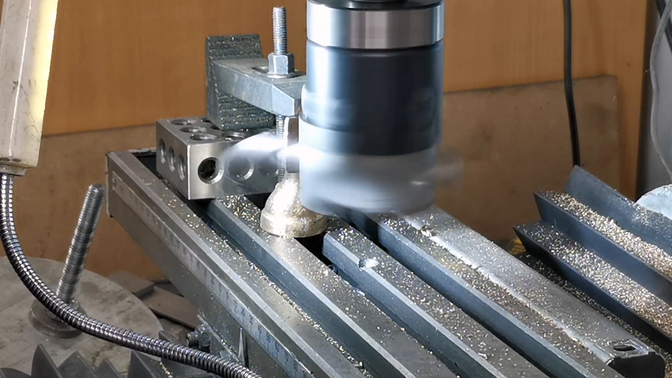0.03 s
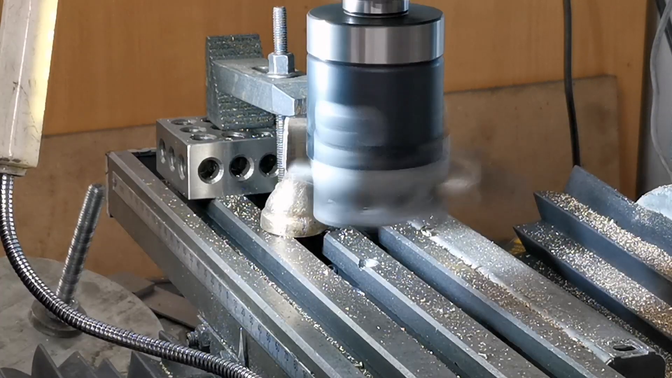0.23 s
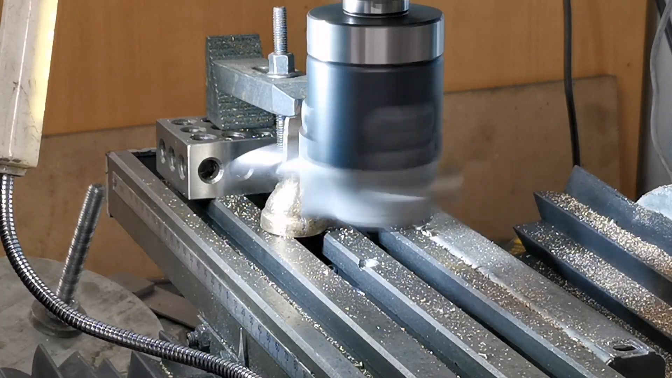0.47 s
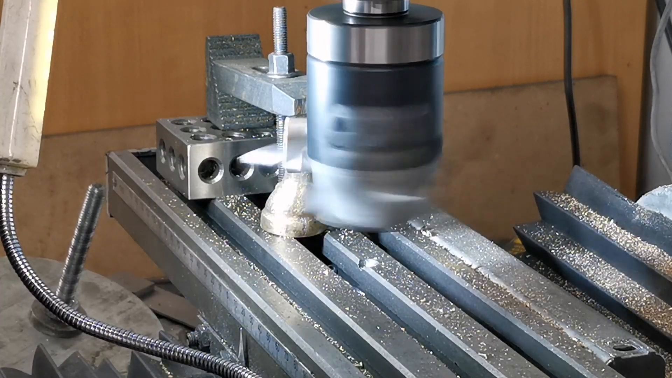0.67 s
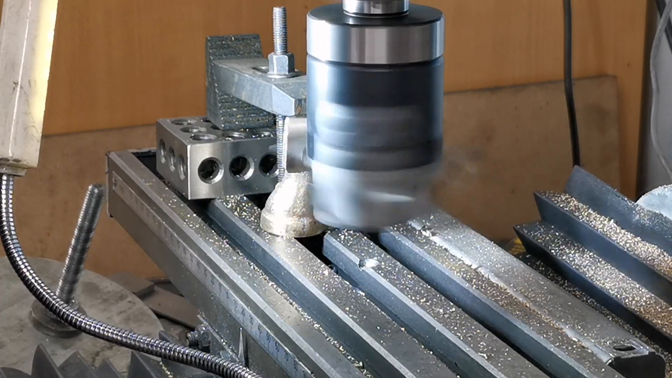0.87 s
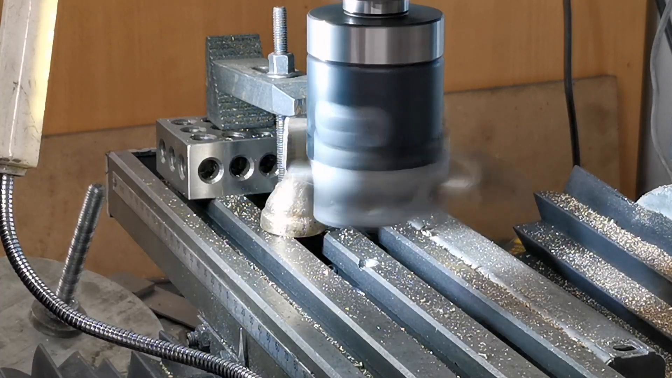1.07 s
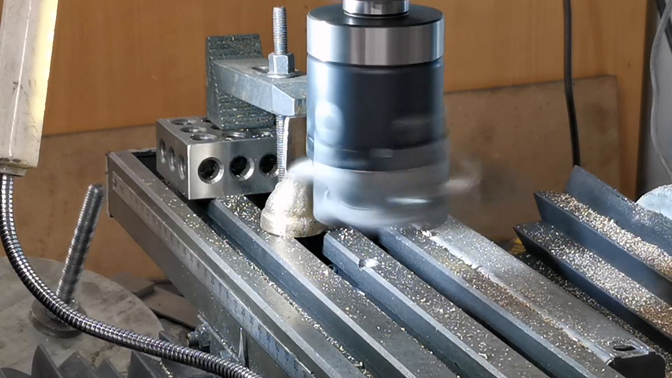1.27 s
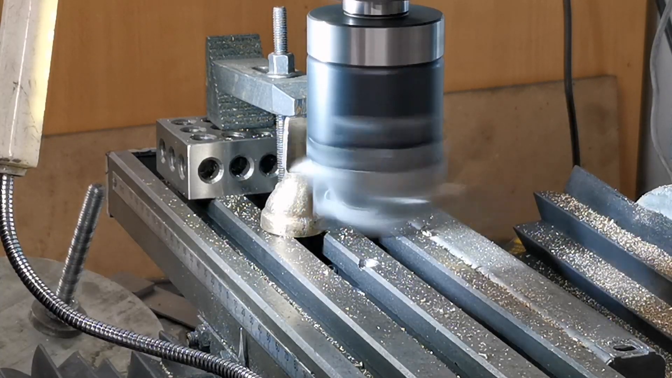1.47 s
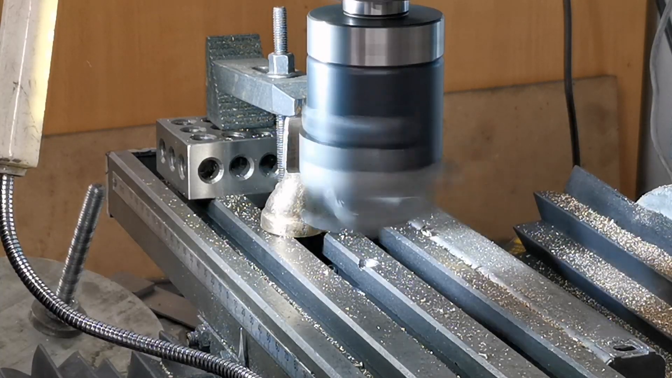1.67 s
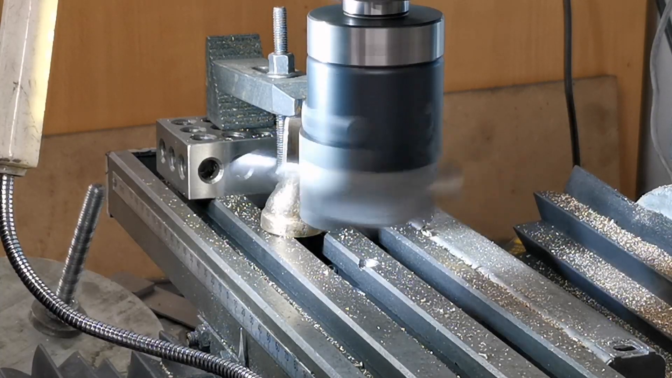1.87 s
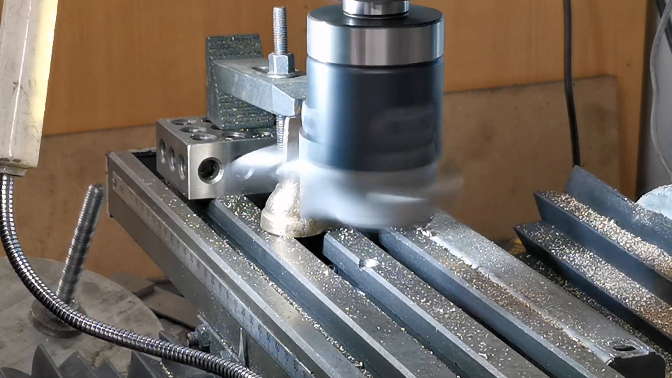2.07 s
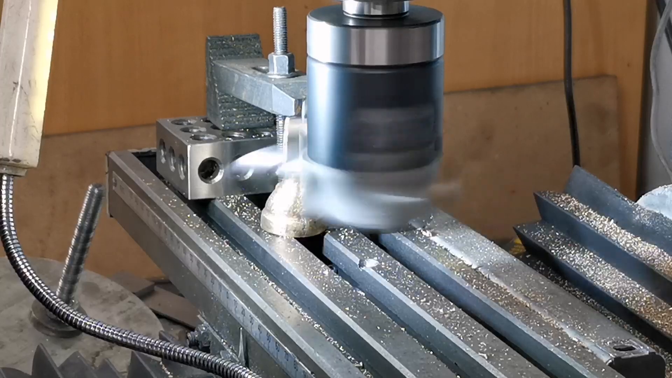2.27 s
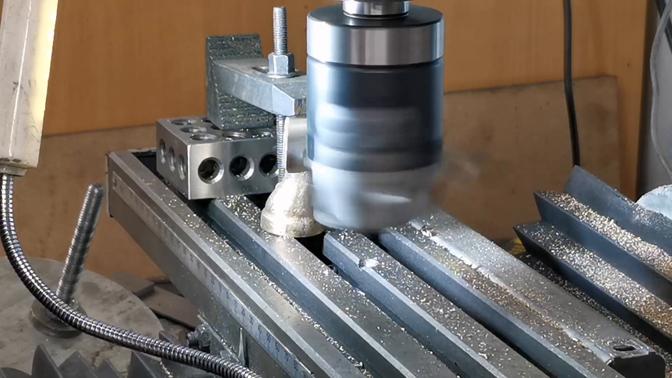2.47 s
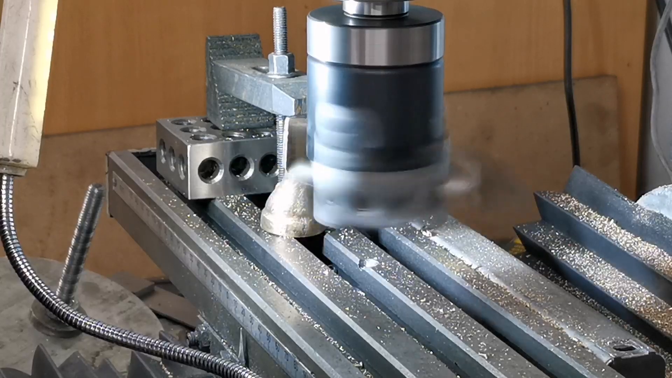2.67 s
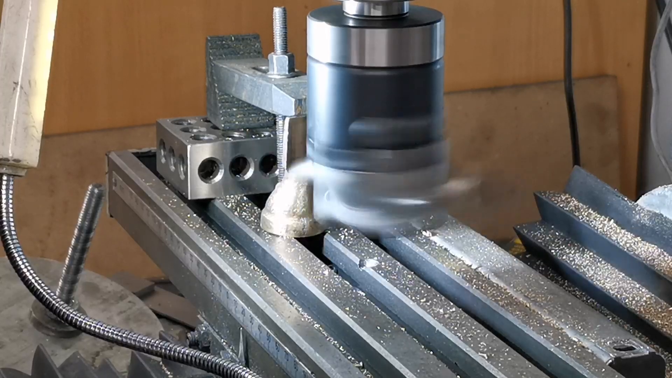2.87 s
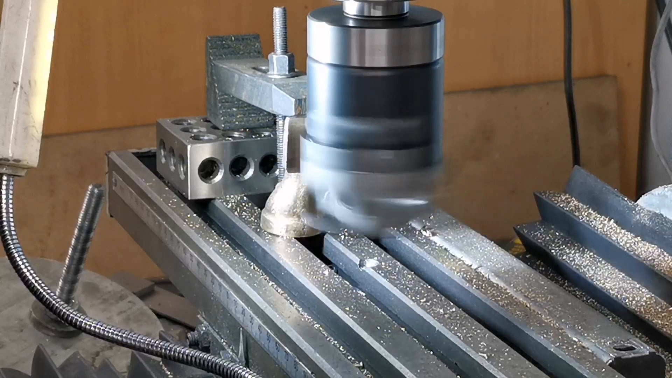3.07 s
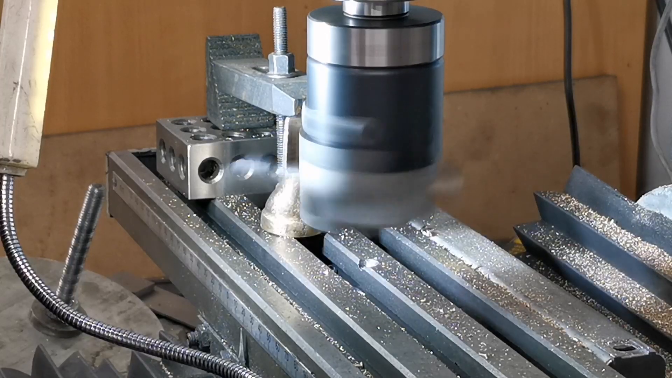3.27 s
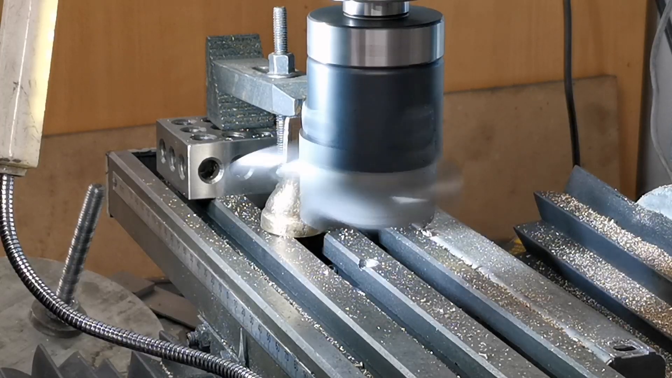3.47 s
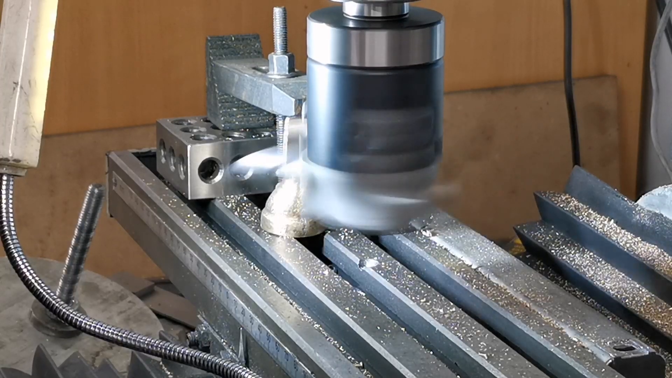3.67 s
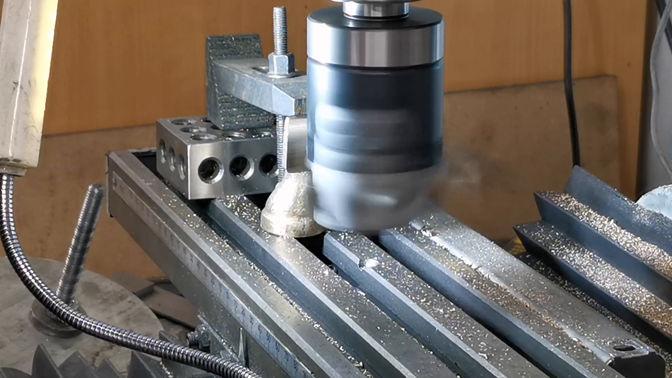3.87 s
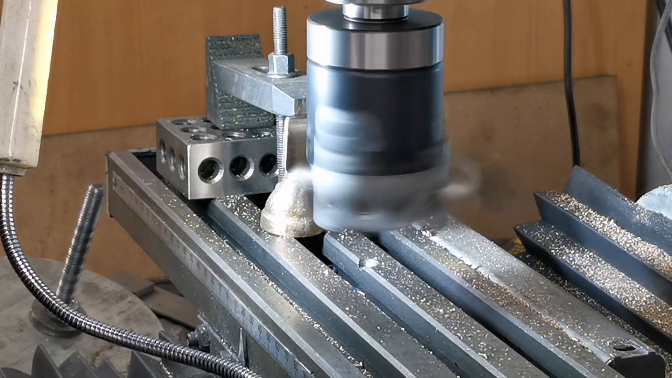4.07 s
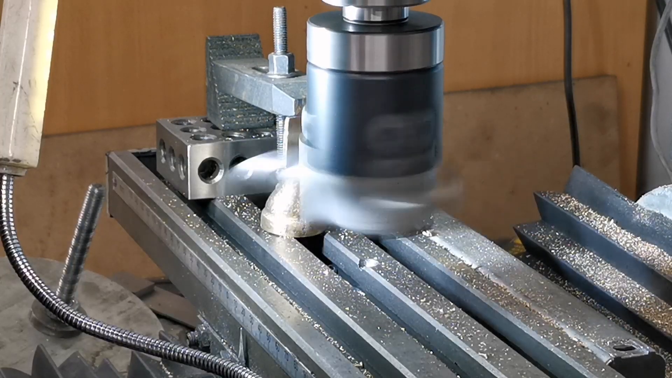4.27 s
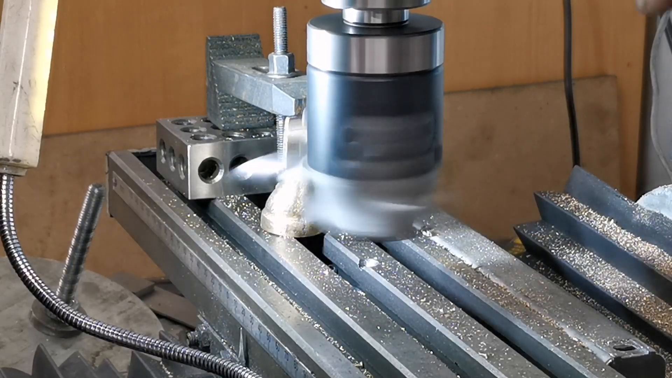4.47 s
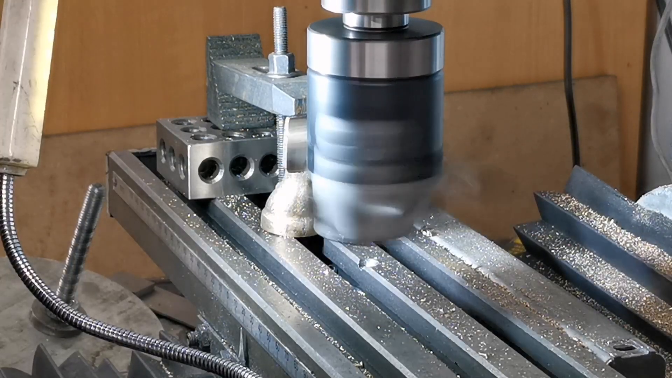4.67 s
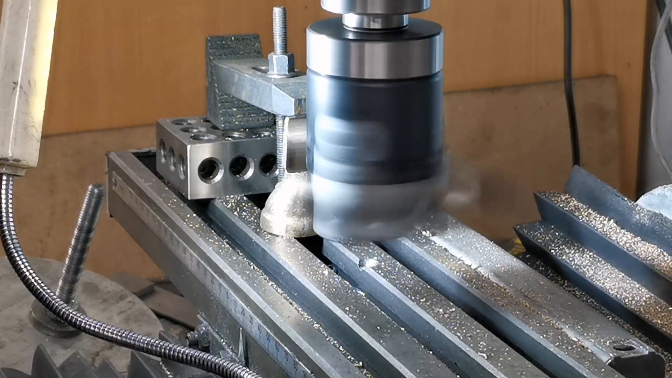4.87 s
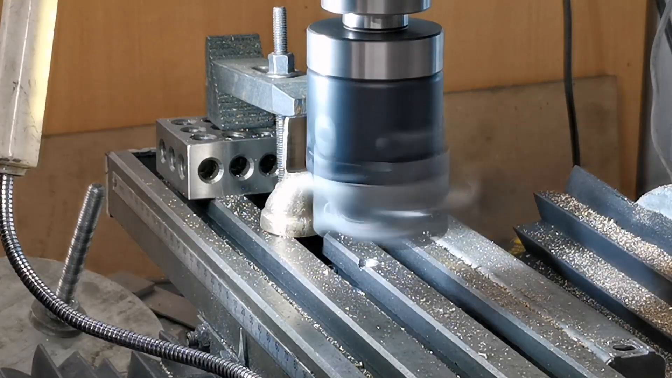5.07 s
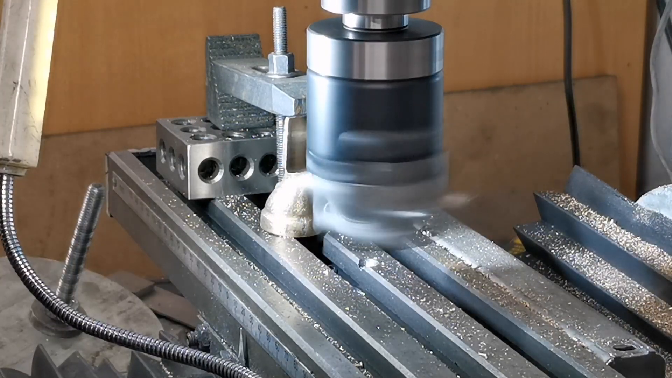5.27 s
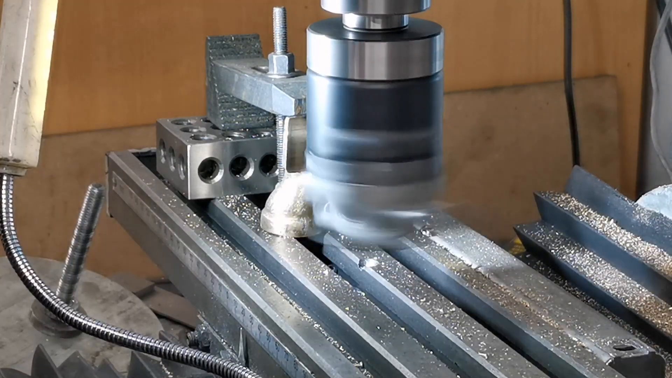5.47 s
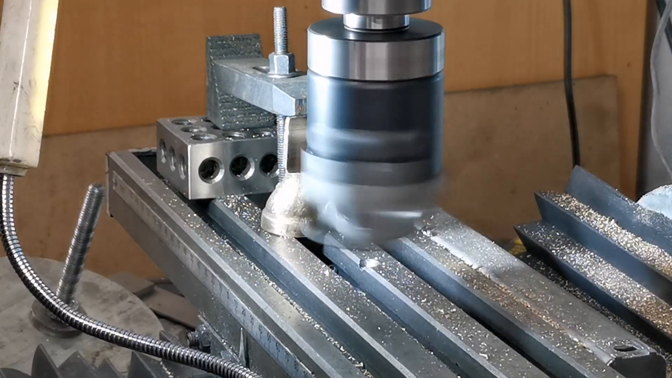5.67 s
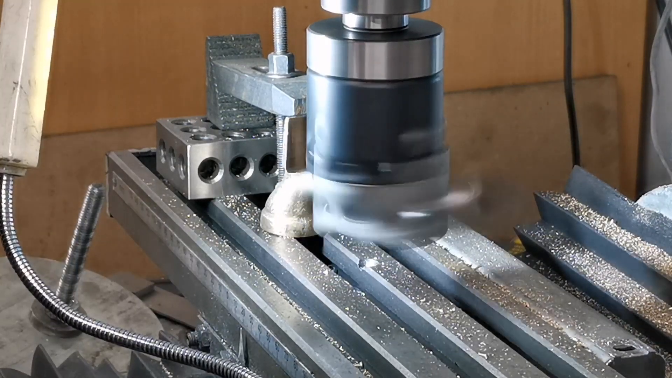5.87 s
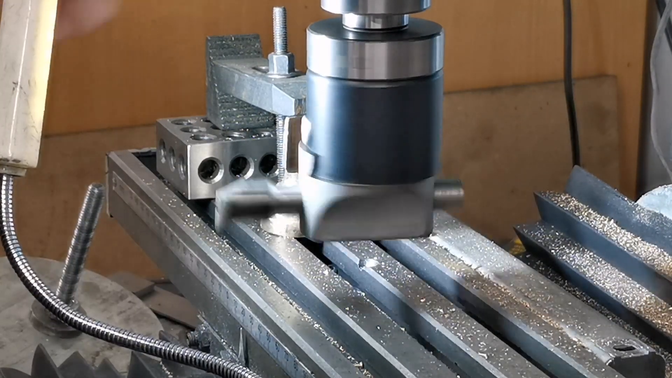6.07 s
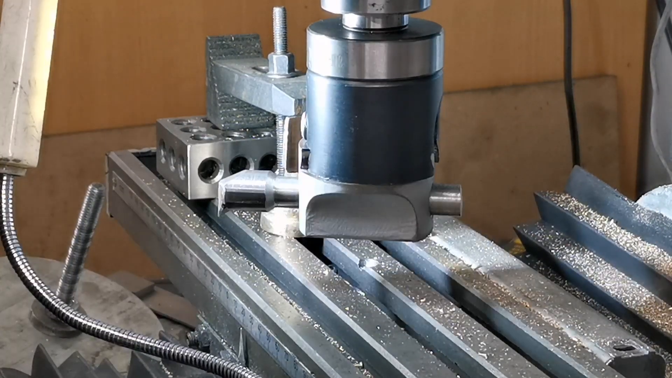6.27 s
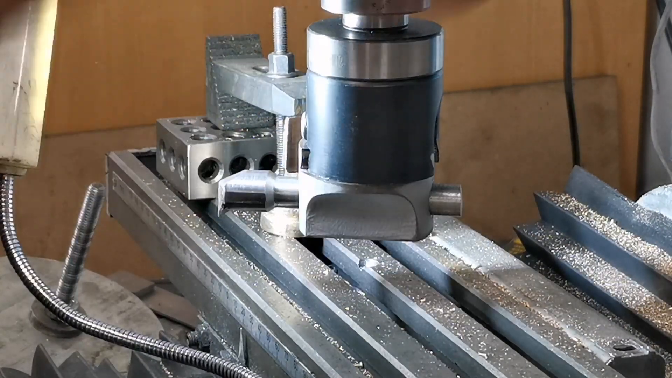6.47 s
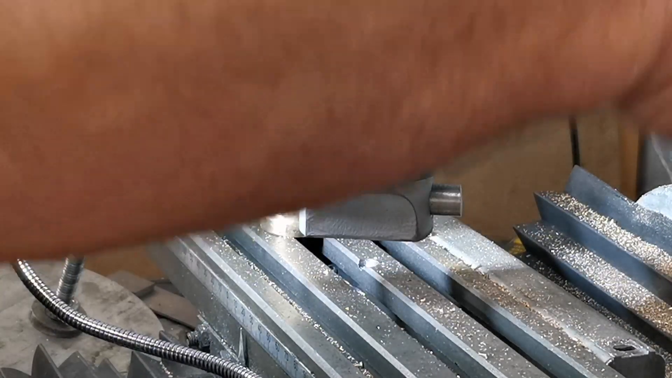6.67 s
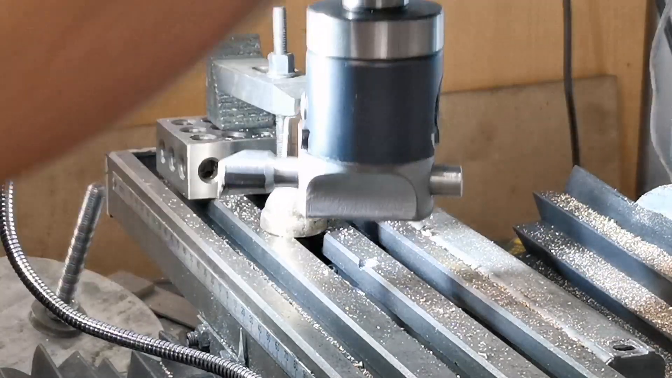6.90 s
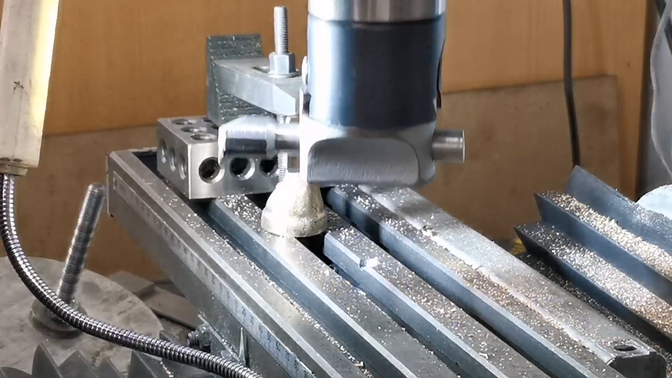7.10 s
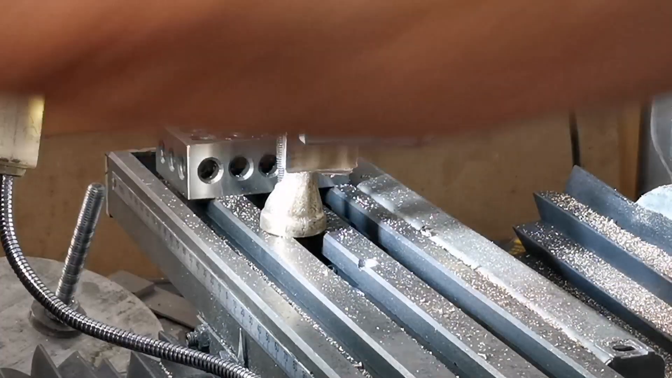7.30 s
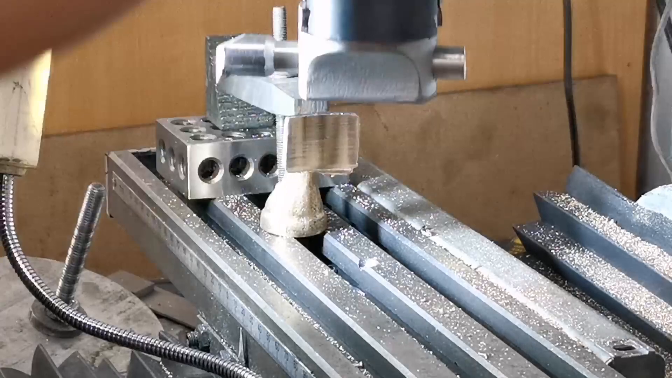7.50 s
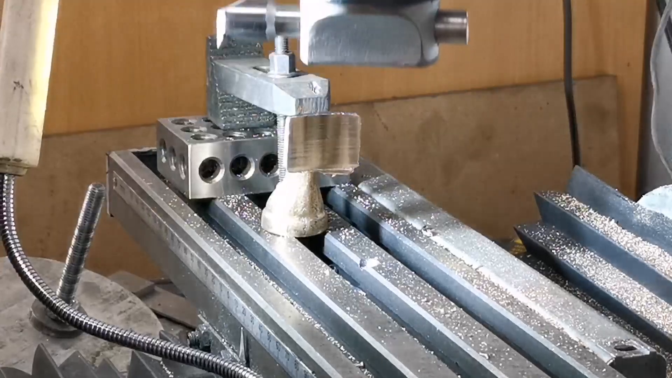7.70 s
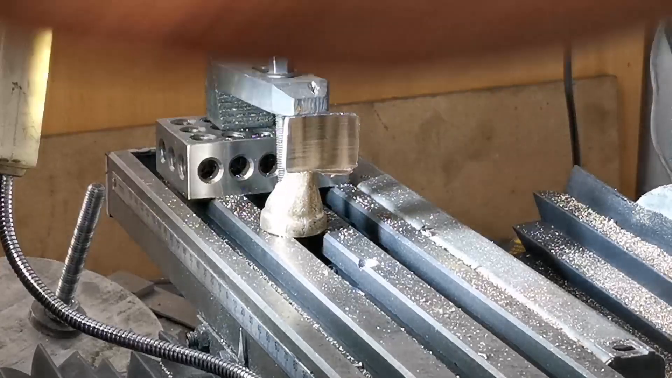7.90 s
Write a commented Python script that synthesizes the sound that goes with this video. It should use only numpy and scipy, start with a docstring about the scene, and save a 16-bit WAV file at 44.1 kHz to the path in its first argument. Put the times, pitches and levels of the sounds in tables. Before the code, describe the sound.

A rotating boring head tears at a metal part about fifteen times a second, harsh and ringing, heaviest at first. The rasp weakens to thin grazing pings above wavering gear tones. Two bursts of clacks bracket the falling whine as it stops. Near quiet follows, then a lever clack and a low, scraping rise of the quill, heard close in a small room.

```python
"""First comes a rasp 15.5 times a second over gear whine: a mill's one-tipped boring head cutting a metal part.
It stands close by in a small workshop, heard through two close microphones. Each pass of the tip tears a chip,
thumps the table and rings frame, part and boring bar, which chatters early on; the part groans near the end.
Once clear, the tip only ticks as it grazes the part: a ping that springs up to pitch, over gear tones and noise.
Switches clack in short noise bursts, the spindle runs down, a lever is released and the quill rumbles up."""
import sys
import numpy as np
from scipy import signal
from scipy.fft import rfft, irfft
from scipy.io import wavfile
from scipy.ndimage import uniform_filter1d, map_coordinates

SR = 44100
rng = np.random.default_rng(int(sys.argv[2]) if len(sys.argv) > 2 else 0)


def pcm_store(signal):
    """Save signal as 16-bit PCM."""
    levels = np.round(np.clip(np.atleast_2d(signal), -1, 1) * 32767)
    wavfile.write(sys.argv[1], SR, levels.astype(np.int16).T)


N = 350154
TIME = np.arange(N) / SR


def gain_of(db):
    """Decibels to gain."""
    return 10 ** (np.asarray(db) / 20)


def evened(x):
    """Scales to rms 1."""
    return x / np.sqrt(np.mean(x ** 2) + 1e-20)


def read(points, hz):
    """Reads a table on a log-frequency axis."""
    f, value = np.transpose(points)
    return np.interp(np.log(hz + 1), np.log(f + 1), value)


def add(mix, s, sound):
    """Mixes a sound in at time s, cut off at the end of the mix."""
    part = mix[..., max(round(s * SR), 0):][..., :sound.shape[-1]]
    part += sound[..., :part.shape[-1]]


def wander(hz, size=32):
    """Slow random signal of rms about 1, moving at rates up to about hz."""
    coarse = TIME[::size]
    lowpass = np.exp(-(np.fft.rfftfreq(len(coarse), size / SR) / hz) ** 2)
    slow = irfft(rfft(rng.standard_normal(len(coarse))) * lowpass, len(coarse))
    return evened(np.interp(TIME, coarse, slow))


# likeness of the two microphones: (frequency [Hz], left-right correlation)
LIKENESS = [(30, 0.15), (130, 0.85), (640, 0.95), (1410, 0.89), (3100, 0.37), (6800, 0), (15000, 0)]


def paired(x):
    """Makes two unrelated signals alike in the bass, as at two close microphones."""
    a, b = rfft(x)
    same = np.clip(read(LIKENESS, np.fft.rfftfreq(x.shape[1], 1 / SR)), -1, 1)
    return irfft(np.array([a, same * a + np.sqrt(1 - same ** 2) * b]), x.shape[1])


def noise(colour):
    """Diffuse stereo noise of rms 1 with the given spectrum."""
    white = paired(rng.standard_normal((2, N)))
    spectrum = gain_of(read(colour, np.fft.rfftfreq(N, 1 / SR)))
    return evened(irfft(rfft(white) * spectrum, N))


def tinted(x, colour, tilt_db=0, size=2048):
    """Causal minimum-phase filter of power gain 1, tilted by dB per octave."""
    hz = abs(np.fft.fftfreq(size, 1 / SR))
    log_gain = np.log(gain_of(read(colour, hz) + tilt_db * np.log2(hz + 20)) + 1e-6)
    taps = np.fft.ifft(np.exp(signal.hilbert(log_gain).conj())).real
    return signal.oaconvolve(x, taps / np.linalg.norm(taps))[:len(x)]


def ringing(x, modes):
    """A sum of damped modes (Hz, width Hz, dB); each one's dB is its power gain for a rough force."""
    t = TIME[:SR // 4]
    taps = np.zeros(len(t))
    for k, (hz, width, db) in enumerate(modes):
        size = gain_of(db) * np.sqrt(4 * np.pi * width / SR)
        taps += size * np.exp(-np.pi * width * t) * np.sin(2 * np.pi * hz * t + k * np.pi / 2)
    return signal.oaconvolve(x, taps)[:len(x)]


def swell(t, peak_s):
    """Rises smoothly to 1 at peak_s and dies away."""
    return (t / peak_s * np.exp(1 - t / peak_s)) ** 2


def high_passed(x, hz, order=2):
    """Takes out the bass: slow motion radiates no sound."""
    return signal.sosfilt(signal.butter(order, hz, "high", fs=SR, output="sos"), x)


def smoothed(taps, width_hz=110):
    """Evens out the broad peaks and dips of a scattered response."""
    size = 2 * taps.shape[-1]
    bins = rfft(taps, size)
    power = np.atleast_2d(abs(bins) ** 2).mean(0)
    power = uniform_filter1d(power, max(int(width_hz * size / SR), 1))
    return irfft(bins / np.sqrt(abs(power) + 1e-12), size)[..., :size // 2]


# reverberation of the workshop: (frequency [Hz], time to fall 60 dB [s])
ROOM_T60 = [(150, 0.38), (400, 0.5), (1040, 0.21), (2760, 0.35), (7280, 0.35), (15000, 0.35)]


def workshop(x, near_db, wet_db, near_s=0.0082):
    """Direct sound, quick reflections off the machine and the tail of the room, at two microphones."""
    t = TIME[:SR // 2]
    near, far = (paired(rng.standard_normal((2, len(t)))) for _ in range(2))
    near *= np.exp(-t / near_s) * (t > .0006)
    # the tail dies at its own rate in each frequency band
    hz, frame_s, bands = signal.stft(far, SR, nperseg=256)
    decay = gain_of(-60 * frame_s / read(ROOM_T60, hz)[:, None])
    far = signal.istft(bands * decay, SR, nperseg=256)[1][:, :len(t)]
    far = smoothed(far, width_hz=72) * np.minimum(t / 0.0061, 1)
    taps = gain_of(near_db) * near / np.linalg.norm(near[0])
    taps += gain_of(wet_db) * far / np.linalg.norm(far[0])
    taps[:, 0] += 1  # direct sound
    taps = smoothed(taps)
    return signal.oaconvolve(x[None], taps / np.linalg.norm(taps[0]), axes=1)[:, :N]


def gliding(curve, rough, jitter_hz):
    """One unsteady note that follows a curve of pitch and level."""
    s, hz, db = np.transpose(curve)
    turns = np.cumsum(np.interp(TIME, s, hz) + jitter_hz * wander(60)) / SR
    level = gain_of(np.interp(TIME, s, db)) * (TIME >= s[0]) * (TIME <= s[-1])
    return level * (1 + rough * wander(28)) * np.sqrt(2) * np.sin(2 * np.pi * turns)


# still air of the shop: (frequency [Hz], spectrum level [dB per Hz])
SHOP = [(18, -32), (34, -1), (92, -12), (289, -17), (2270, -27.5), (7730, -23.5), (11700, -28.5),
        (15500, -25)]


def still_air(level_db=-71):
    """The quiet shop around the machine: steady diffuse noise."""
    return gain_of(level_db) * noise(SHOP)


# spindle drive: (time [s], pitch of the gears [share of full], level [dB])
DRIVE = [(0, 0.98, -41), (.5, 0.96, -47.5), (3.9, 1, -48.5), (4.3, 0.99, -49), (4.9, 0.96, -49),
         (5.3, 0.99, -48), (5.85, .98, -48.5), (6.03, 0.95, -51), (6.15, 0.8, -55.5), (6.28, 0.63, -56.5),
         (6.499, 0.27, -108)]
# rolling noise of the gears at full speed: (frequency [Hz], spectrum level [dB per Hz])
GEAR_NOISE = [(59, -50.5), (100, -23.5), (188, -14.5), (290, -19), (400, -9.5), (600, -7.5), (840, -4),
              (1070, -11), (1250, -2.5), (1400, -8), (1630, 0), (1950, -7.5), (2130, -5.5), (2330, -12),
              (2780, -10.5), (3460, -17.5), (9000, -14), (11900, -25), (15000, -20)]
# gear and motor tones: (frequency at full speed [Hz], level before its swell [dB re drive], swell time [s])
GEAR_TONES = [(551, -18, 6.03), (636.6, -15, 4.43), (765, -20, 3.98), (750.5, -17.5, 4.25),
              (847, -16, 4.65), (815, -21, 2.8), (1580, -17.5, 5.06), (1642, -18.5, 5.44),
              (1662, -22, 4.76)]


def gears(noise_db=-3, tones_db=0, flutter=0.00591, rough=0.41, rattle_db=1.0,
          swell_db=10.5, swell_s=0.17, drift=0.006):
    """Wavering gear tones swell in turn over rolling noise; all of it sinks in pitch as the spindle slows."""
    s, speed, db = np.transpose(DRIVE)
    pace = np.interp(TIME, s, speed)
    travel = np.cumsum(pace * (1 + flutter * wander(6.6))) / SR
    tones = np.zeros(N)
    for hz, tone_db, peak_s in GEAR_TONES:
        bulge_db = swell_db * np.exp(-((TIME - peak_s) / swell_s) ** 2)
        size = gain_of(tone_db + bulge_db) * (1 + rough * wander(29))
        slip = drift * np.cumsum(wander(3.018)) / SR
        tones += size * np.sin(2 * np.pi * hz * (travel + slip) + 0.54 * wander(13.0))
    # the noise is read more slowly as the gears slow
    place = np.cumsum(pace)
    rolling = np.array([map_coordinates(side, [place], order=3, mode="wrap") for side in noise(GEAR_NOISE)])
    rolling *= gain_of(noise_db + rattle_db * wander(150))
    return gain_of(np.interp(TIME, s, db)) * (rolling + gain_of(tones_db) * tones)


# loudest gear tone: (time [s], pitch [Hz], level [dB])
WHINE = [(0, 904, -81), (5.15, 889, -61), (5.35, 902, -60), (5.92, 903, -61), (6.06, 860.5, -53.5),
         (6.15, 810, -66), (6.3, 646, -96)]


def whine():
    """The loudest gear tone swells as the spindle runs free and falls in pitch as it brakes."""
    return gliding(WHINE, rough=0.45, jitter_hz=16.4)


# whistles of the motor control: (start [s], end [s], pitch [Hz], level at start [dB], fading [dB per s])
WHISTLES = [(0, 6.06, 15531, -70, 0), (0, 6.06, 15655, -68, 0), (6.22, 6.45, 7660, -62, 85),
            (6.22, 6.45, 8260, -72, 55)]


def whistles(fade_s=.04):
    """The motor control sings thinly while it drives, and dies away as it brakes."""
    out = np.zeros(N)
    for start, end, hz, db, fading_db in WHISTLES:
        gate = np.clip(np.minimum(TIME - start, end - TIME) / fade_s, 0, 1)
        level = gain_of(db - fading_db * np.clip(TIME - start, 0, end - start))
        out += gate * level * np.sqrt(2) * np.sin(2 * np.pi * hz * TIME + .5 * wander(20))
    return out


# spindle, wavering a little in speed and braking at the end: (time [s], speed [turns per s])
SPINDLE = [(0, 15.37), (0.48, 15.74), (0.8, 15.51), (0.9, 14.85), (1.0, 15.44), (1.7, 15.64), (1.8, 15.41),
           (2.58, 15.44), (3.05, 15.9), (3.15, 15.56), (3.68, 15.37), (3.81, 15.97), (4.05, 15.45),
           (5.24, 15.49), (5.85, 14.93), (6.0, 12.73), (6.1, 11.02)]
# two stretches of passes, the first heavy and short; the beat jumps between them: (first pass [s], end [s])
RUNS = [(0.018, 0.37), (0.4385, 6.13)]
CLEAR_S = 4.14  # from here the tip is clear of the cut


def passes():
    """The times at which the tip meets the part: once in every turn of the spindle within a stretch."""
    turns = np.cumsum(np.interp(TIME, *np.transpose(SPINDLE))) / SR
    whole_turns = [np.arange(*np.interp(run, TIME, turns)) for run in RUNS]
    return np.interp(np.concatenate(whole_turns), turns, TIME)


# force of the cut, before trims: (time [s], rasp level [dB], squeal level of the boring bar [dB])
LOAD = [(0, -29, -28), (.34, -28.5, -33.5), (.5, -28.5, -29), (1.2, -29.5, -33), (2.2, -31.5, -34.5),
        (2.751, -32, -32), (3.45, -33, -35.5), (3.66, -33.5, -38), (3.78, -36.5, -45), (4.05, -36.5, -45),
        (4.111, -45, -50)]
# flung chips that strike the machine, before trims: (time [s], rasp level [dB], tool squeal level [dB])
CHIPS = [(0.374, -34.5, -34.5), (0.407, -39, -39)]


def cuts(rasp_scatter_db=0.66, squeal_scatter_db=0.3):
    """Rows (s, rasp dB, squeal dB): each pass follows the load with a little chance; then the chips."""
    at = passes()
    at = at[at < CLEAR_S]
    s, rasp_db, squeal_db = np.transpose(LOAD)
    chance = rng.standard_normal((len(at), 2))
    rasp = np.interp(at, s, rasp_db) + rasp_scatter_db * chance[:, 0]
    squeal = np.interp(at, s, squeal_db) + squeal_scatter_db * chance[:, 1]
    return list(zip(at, rasp, squeal)) + CHIPS


# the bite as the tip works out of the part, before trims:
# (time [s], shove level [dB re rasp], crunch level [dB re rasp], scrape level [dB re rasp])
BITE = [(0, -10.5, -4, -13), (.36, -10.5, -4, -6), (.44, -13, -20, -7), (2.6, -11, -22.5, -11),
        (3.6, -12.5, -14.5, -13), (3.73, -14, -7.5, -26), (3.8, -19, -18, -1.5), (4.05, -18, -24, -4),
        (4.119, -32, -2, 4)]
# scrapes of the breaking chip: (mean frequency [Hz], width [Hz], mean level [dB])
SCRAPE_MODES = [(3574, 78, -1.5), (3857, 162, 0), (4410, 240, -1), (4830, 120, -1), (4950, 75, -4)]


def scraping(blows, grain_s=0.0016, gap_s=.0026, uneven_db=2.5, detune=0.015):
    """The chip breaks away in two quick scrapes, whose strength and colour change with every pass."""
    t, out = TIME[:SR // 16], np.zeros(N)
    bite_s, _, _, scrape_db = np.transpose(BITE)
    for s, level_db, _ in blows:
        for start in s, s + gap_s * (1 + rng.random()):
            shift, size = rng.standard_normal((2, len(SCRAPE_MODES)))
            modes = [(hz * (1 + detune * a), width, db + uneven_db * b)
                     for (hz, width, db), a, b in zip(SCRAPE_MODES, shift, size)]
            scrape = ringing(swell(t, grain_s) * rng.standard_normal(len(t)), modes)
            add(out, start - .001, gain_of(level_db + np.interp(s, bite_s, scrape_db)) * scrape)
    return out


# tearing metal: (frequency [Hz], spectrum level [dB per Hz])
RASP = [(60, -55), (130, -15.5), (250, -1.5), (420, -1.5), (600, -2.5), (900, -4.5), (1400, -3.5),
        (1800, -2), (2100, -7.5), (2600, 0.5), (2950, -11.5), (3300, 3.5), (3700, -6.5), (5400, -11),
        (6500, -6), (7900, -6.5), (10500, -12), (13000, -19), (15500, -25)]
# crunch of the bite: (frequency [Hz], width [Hz], level [dB])
CRUNCH_MODES = [(412, 20, -10.5), (960, 110, 1), (1043, 150, -2.5), (1537, 100, -2), (2472, 194, 5.5),
                (3070, 200, 3.5), (3730, 167, -1)]
# the close walls throw each blow back: (delay [s], level [dB])
WALLS = [(0.0144, -21.5), (0.028, -19)]


def tearing(blows, contact_s=0.0027, rasp_db=0.5, rub_db=-8, rub_s=0.0034, grain_db=2.0):
    """The tip rubs unevenly as it tears a chip: each knock keeps its body and takes a new fine grain."""
    t, force = TIME[:SR // 16], np.zeros(N)
    contact = swell(t, contact_s)
    body = smoothed(contact * rng.standard_normal(len(t)), width_hz=20)
    knock = rfft(body) * np.linalg.norm(contact)
    # share of power that repeats at every pass, falling towards the treble
    alike = .1 + .87 / (1 + (np.fft.rfftfreq(len(t), 1 / SR) / 3800) ** 3)
    for s, level_db, _ in blows:
        fresh, grain, slips = rng.standard_normal((3, len(t)))
        grain_gain = gain_of(grain_db * evened(uniform_filter1d(grain, 30)))
        fresh = contact * evened(fresh * grain_gain)
        tear = irfft(np.sqrt(alike) * knock + np.sqrt(1 - alike) * rfft(fresh), len(t))
        slip_gain = gain_of(grain_db * evened(uniform_filter1d(slips, 90)))
        rub = evened(high_passed(rng.standard_normal(len(t)), 1200) * slip_gain)
        add(force, s - .004, gain_of(level_db + rub_db) * swell(t, rub_s) * rub)
        add(force, s + 0.0003, gain_of(level_db) * tear)
    s, _, crunch_db, _ = np.transpose(BITE)
    crunch = ringing(force * gain_of(np.interp(TIME, s, crunch_db)), CRUNCH_MODES)
    rasp = high_passed(gain_of(rasp_db) * tinted(force, RASP) + crunch + scraping(blows), 170)
    heard = rasp.copy()
    for delay_s, db in WALLS:
        add(heard, delay_s, gain_of(db) * rasp)
    return workshop(heard, near_db=0.5, wet_db=-1.5, near_s=0.0039)


def struck(modes, t, rise_s, rough=0, uneven_db=0.7, apart_hz=6000):
    """One blow on modes (Hz, dB, t60 s): highs vary most from blow to blow and from left to right."""
    hz, db, t60 = np.transpose(modes)[:, :, None]
    size, phase, apart = rng.standard_normal((3, len(modes), 1))
    height = gain_of(db + uneven_db * size) * np.exp(1j * phase * (hz / 2400) ** 2)
    # the rubbing tip roughens each mode in strength and phase
    a, b = evened(uniform_filter1d(rng.standard_normal((2, len(t))), size=110))
    waves = height * np.exp((2j * np.pi * hz - np.log(1000) / t60) * t) * (1 + rough * (a + 1j * b))
    turn = np.exp(.5j * apart * hz / apart_hz)
    sides = np.array([(waves * turn).real.sum(0), (waves / turn).real.sum(0)])
    return sides * (1 - np.exp(-(t / rise_s) ** 2))


# column, head and clamp: (frequency [Hz], mean level [dB re rasp], time to fall 60 dB [s])
FRAME_MODES = [(452.5, -22.5, 0.11), (748, -16, 0.1), (1103, -14.5, 0.1), (1608, -21.5, 0.2),
               (1933, -19.5, 0.22), (2289, -14, .15), (2335, -12, .06), (2371, -10.5, .165),
               (6100, -12.5, 0.062)]
# boring bar: (frequency [Hz], mean level before trim [dB re squeal], time to fall 60 dB [s])
TOOL_MODES = [(7350, -4, .075), (7590, -1.5, .05), (7830, -8.5, .055)]
# clamped part: (frequency [Hz], mean level before trim [dB], time to fall 60 dB [s])
PART_MODES = [(3166, -5, .115), (3290, -7, .04)]
# shoved table: (frequency [Hz], level before trim [dB], delay [s], time from start to peak [s])
TABLE_MODES = [(162.5, -0.5, 0.004, 0.0072), (145, -11.5, 0.003, 0.021), (289.6, -11, 0.0023, .017),
               (495, -3.5, 0.00739, .0022)]


def shaking(blows, frame_db=0, squeal_db=1, shove_db=1, shove_scatter_db=1, part_db=8, part_top_db=-30,
            lowest_hz=105, frame_rise_s=0.0012, squeal_lag_s=0.0028, squeal_rise_s=0.00086,
            part_rise_s=0.0013):
    """Each pass rings frame and boring bar and shoves the table; the part's ring is capped in level."""
    t = TIME[:SR // 5]
    bite_s, heavy_db, _, _ = np.transpose(BITE)
    thump = np.zeros(len(t))
    for hz, db, delay_s, peak_s in TABLE_MODES:
        push = swell(np.maximum(t - delay_s, 0), peak_s)
        thump += gain_of(db) * push * np.sin(2 * np.pi * hz * (t - delay_s))
    thump = high_passed(thump, lowest_hz)
    metal, table = np.zeros((2, N)), np.zeros(N)
    for s, level_db, tool_db in blows:
        frame = gain_of(level_db + frame_db) * struck(FRAME_MODES, t, frame_rise_s)
        part_level = gain_of(min(level_db + part_db, part_top_db))
        part = part_level * struck(PART_MODES, t, part_rise_s, rough=0.2)
        bar = gain_of(tool_db + squeal_db) * struck(TOOL_MODES, t, squeal_rise_s)
        add(metal, s + 0.002008, frame + part)
        add(metal, s + squeal_lag_s, bar)
        push_db = level_db + shove_db + np.interp(s, bite_s, heavy_db)
        push_db += shove_scatter_db * rng.standard_normal()
        add(table, s - .002, gain_of(push_db) * thump)
    return metal + table + gain_of(-11) * workshop(metal[0], near_db=-8, wet_db=15)


# chatter of the boring bar after the deepest bites: (time at its loudest [s], level before the room [dB])
CHATTER = [(0.036, -29.5), (.101, -29.5), (.169, -30.5), (.227, -24.5), (.289, -31), (.357, -31.5),
           (.452, -29.5)]


def chatter(hz=7355, half_length_s=0.0082):
    """Under a deep bite the boring bar keeps itself shaking: a short squeal that swells and dies."""
    level = sum(gain_of(db) * np.exp(-((TIME - s) / half_length_s) ** 2) for s, db in CHATTER)
    squeal = level * np.sin(2 * np.pi * hz * TIME + .5 * wander(60))
    return workshop(squeal, near_db=-11.5, wet_db=-10.5)


# groan of the part: (time [s], pitch [Hz], level [dB])
GROAN = [(3.7, 473, -70), (3.86, 474, -59), (3.97, 484, -54.5), (4.11, 460, -69)]


def groan():
    """The part groans as the bite turns shallow: one low, rough note."""
    return gliding(GROAN, rough=0.71, jitter_hz=4.9)


# firmness with which the tip grazes the finished face, before scatter and trims: (time [s], level [dB])
GRAZE = [(4.17, -44), (4.37, -39), (4.44, -45.5), (4.56, -38), (4.63, -57), (4.7, -35.5), (4.76, -41),
         (4.92, -62), (5.03, -44), (5.3, -52.5), (5.5, -45), (5.8, -56), (5.98, -40), (6.1, -49)]
# pitch to which the tip's ping settles: (time [s], pitch [Hz])
PING = [(4.2, 9300), (5, 9630)]
# the tip's brief rub: (frequency [Hz], width [Hz], level [dB])
TIP_HISS = [(13000, 5000, -34), (9560, 260, -2)]


def grazing(touch_s=0.0012, ping_db=-1, ping_s=0.0055, flat_hz=260, settle_s=0.0053,
            linger_db=-11, linger_s=0.051, rub_db=-1, part_hz=3880, part_db=-3.5, part_s=0.012,
            leave_s=0.36, scatter_db=2):
    """Clear of the cut, the tip just touches once a turn: its ping starts flat, springs up and lingers."""
    t, at = TIME[:SR // 5], passes()
    pings, rub = np.zeros((2, N))
    attack = 1 - np.exp(-(t / touch_s) ** 2)
    for s in at[at > CLEAR_S]:
        db = np.interp(s, *np.transpose(GRAZE)) + scatter_db * rng.standard_normal()
        hz = np.interp(s, *np.transpose(PING)) - flat_hz * np.exp(-t / settle_s)
        decay = np.exp(-t / ping_s) + gain_of(linger_db) * np.exp(-t / linger_s)
        tip = decay * np.sin(2 * np.pi * np.cumsum(hz) / SR)
        # the part's own ring weakens from pass to pass
        part = np.exp(-t / part_s - (s - CLEAR_S) / leave_s) * np.sin(2 * np.pi * part_hz * t)
        add(pings, s, attack * (gain_of(db + ping_db) * tip + gain_of(db + part_db) * part))
        add(rub, s, gain_of(db + rub_db) * swell(t, touch_s) * rng.choice([-1, 1], len(t)))
    return workshop(pings + ringing(rub, TIP_HISS), near_db=4, wet_db=-13.0)


# switches, lever and knocks of the quill, levels before trims: (time [s], clack level [dB], thud level [dB],
# brightness [dB per octave], decay time [s], ring pitch [Hz], ring level [dB re clack])
CLACKS = [(5.7263, -33.5, -73, 2, 0.0048, 614, -9), (5.735, -29.5, -71, 10, 0.0036, 1826, -1),
          (5.7455, -31, -73, 8, 0.003, 1960, -22), (6.193, -32, -49.5, 2, 0.0024, 1144, -8),
          (6.1968, -34.5, -66, 2.5, 0.0014, 510, -5.5), (6.226, -63, -59, 4, 0.0028, 500, -10),
          (6.879, -50, -61, 2, 0.016, 500, -18), (6.891, -47.5, -62, 6.5, 0.0092, 500, -11),
          (6.913, -31.5, -46.5, 7.5, 0.0072, 470, 5), (6.918, -38, -78, -3.5, 0.0073, 503, -14),
          (7.751, -56.5, -61, -2, 0.0089, 370, -6)]
# colour of a clack before its brightness: (frequency [Hz], spectrum level [dB per Hz])
CLACK_COLOUR = [(88, -45), (150, 0), (468, 3.5), (918, -0.5), (1350, -2), (1730, 0), (2180, -4),
                (4540, -11), (7640, -10), (11500, -29.5), (15000, -38)]


def clacks(thud_hz=140, thud_s=0.0018, ring_width_hz=65, ringing_db=3):
    """Each blow is a short crunch of contacts, with a brief ring and a dull thud from the housing."""
    t, out = TIME[:SR // 8], np.zeros(N)
    for s, db, thud_db, tilt_db, length_s, ring_hz, ring_db in CLACKS:
        decay = np.exp(-t / length_s)
        crunch = tinted(rng.standard_normal(len(t)) * decay, CLACK_COLOUR, tilt_db)
        ring = np.exp(-np.pi * ring_width_hz * t) * (1 - decay) * np.sin(2 * np.pi * ring_hz * t)
        thud = swell(t, thud_s) * np.sin(2 * np.pi * thud_hz * t)
        add(out, s, gain_of(db + 5.5) * crunch)
        add(out, s, gain_of(db + ring_db + ringing_db) * ring)
        add(out, s, gain_of(thud_db + 14.5) * thud)
    return workshop(high_passed(out, 123), near_db=3.5, wet_db=-1.5)


# rising quill, before fade-in, lumps and trim: (time [s], rumble level [dB], scrape level [dB],
# rustle level [dB], whining hiss level [dB])
QUILL = [(7.05, -68, -63, -88, -63), (7.19, -65, -72, -83, -69), (7.245, -65, -58.5, -83, -67.5),
         (7.33, -71, -69, -76, -64), (7.52, -59.5, -71, -72.5, -64.5), (7.62, -65, -66, -74, -60.5),
         (7.665, -72, -73, -77, -62), (7.68, -70, -76, -65, -66), (7.79, -64, -68, -73.5, -67.5),
         (7.94, -66, -61.5, -75, -67)]
# rumble of the rack: (frequency [Hz], spectrum level [dB per Hz])
QUILL_RUMBLE = [(29, -25), (60, -14.5), (110, -7), (185, 1.5), (238, -16), (306, -0.5), (380, -22),
                (800, -36), (4000, -80)]
# hollow scrape: (frequency [Hz], spectrum level [dB per Hz])
QUILL_SCRAPE = [(150, -28), (290, -19), (375, -2), (440, 0), (520, -2), (640, -10.5), (790, -6),
                (1030, -15.5), (1640, -14.5), (3000, -24), (8000, -58)]
# dry rustle: (frequency [Hz], spectrum level [dB per Hz])
QUILL_RUSTLE = [(300, -34), (1400, -9), (2150, 6), (2800, -4), (4000, -7.5), (8000, -33)]
# hiss with two narrow whining bands, probably of the motor that raises the quill:
# (frequency [Hz], width [Hz], relative level [dB])
HISS_MODES = [(7600, 160, 1), (8100, 260, -2.5), (8120, 3300, 6)]


def quill(start_s=6.96, lumps_db=3):
    """The quill rises on its rack: rumble, hollow scrape, dry rustle and a hiss with narrow whining bands."""
    s, *levels = np.transpose(QUILL)
    hiss = np.array([ringing(side, HISS_MODES) for side in rng.standard_normal((2, N))])
    hiss = evened(hiss) * gain_of(-1.5)
    lumps = gain_of(lumps_db * wander(29))
    layers = noise(QUILL_RUMBLE) * lumps, noise(QUILL_SCRAPE) * lumps, noise(QUILL_RUSTLE), hiss
    rising = sum(layer * gain_of(np.interp(TIME, s, db)) for layer, db in zip(layers, levels))
    return rising * np.clip((TIME - start_s) / 0.22, 0, 1)


# thin whine, probably of the motor that raises the quill: (time [s], pitch [Hz], level [dB])
THIN_WHINE = [(7.05, 8950, -88), (7.28, 9120, -72.5), (7.5, 9300, -82), (7.65, 9130, -96), (7.8, 9300, -82),
              (7.94, 9360, -75)]


def thin_whine():
    """A thin, unsteady whine near 9 kHz, probably of the motor that raises the quill."""
    return gliding(THIN_WHINE, rough=0.68, jitter_hz=24.8)


def scene():
    """The machine in the quiet shop."""
    running = gears() + whine() + whistles()
    blows = cuts()
    cutting = tearing(blows) + shaking(blows) + chatter() + groan() + grazing()
    handling = clacks() + quill() + thin_whine()
    return still_air() + running + cutting + handling


# colouring by the two microphone ports: (frequency [Hz], left minus right level [dB])
LEFT_BIAS = [(60, -1), (200, -2), (1300, -2), (2400, -1), (4800, -1.5), (6500, -2), (7600, 12.5), (9500, 0),
             (11500, 2.5), (15500, -3.5)]


def record(dry, lead_s=.000015, edge_hz=15950):
    """Two microphone ports colour the sides differently, the left one nearer; then the band limit."""
    hz = np.fft.rfftfreq(N, 1 / SR)
    # half the bias and lead on the left, the opposite half on the right
    left = gain_of(read(LEFT_BIAS, hz) / 2) * np.exp(1j * np.pi * hz * lead_s)
    ported = irfft(rfft(dry) * np.array([left, 1 / left]), N)
    lowpass = signal.firwin(511, edge_hz, window=("kaiser", 9), fs=SR)
    return signal.oaconvolve(ported, lowpass[None], "same")


dry = scene()
out = record(dry)
pcm_store(out)
```